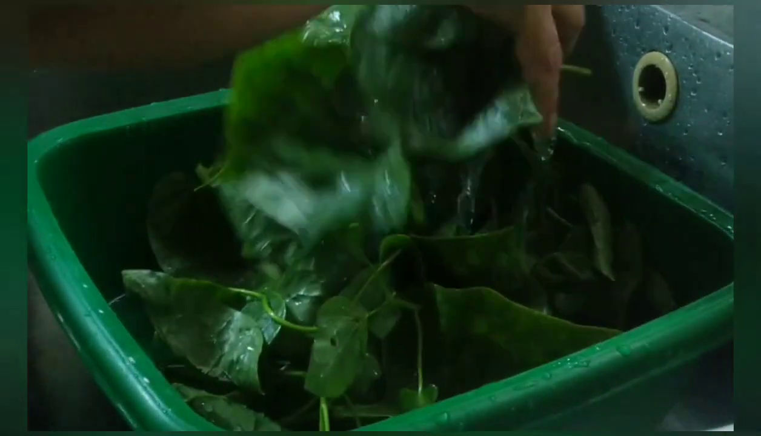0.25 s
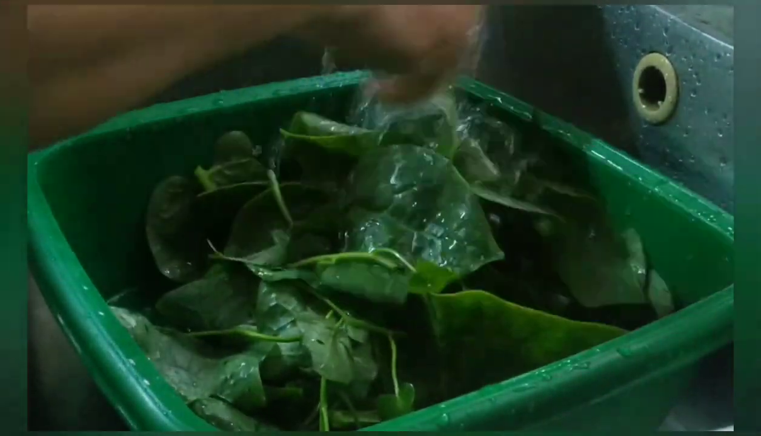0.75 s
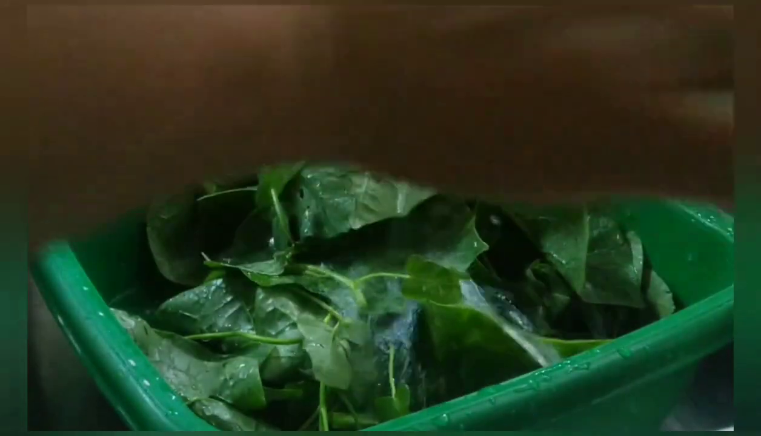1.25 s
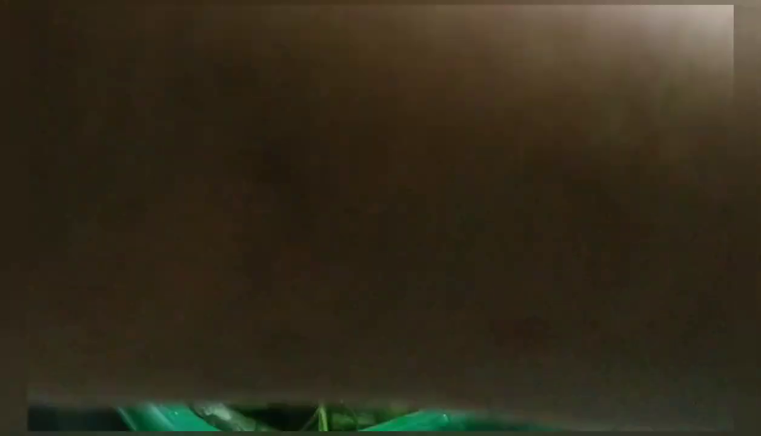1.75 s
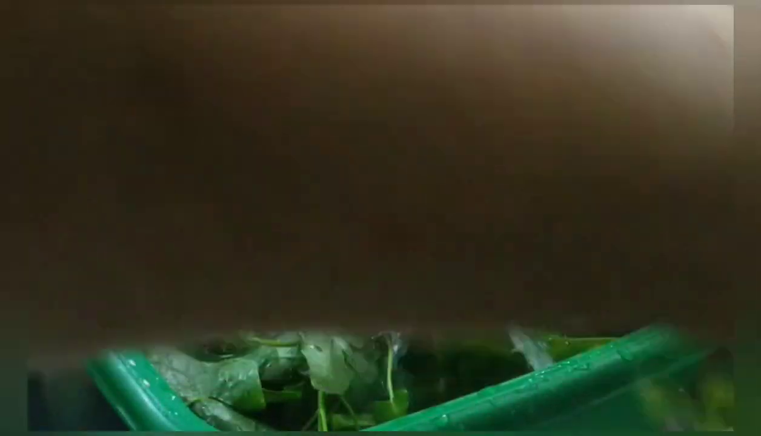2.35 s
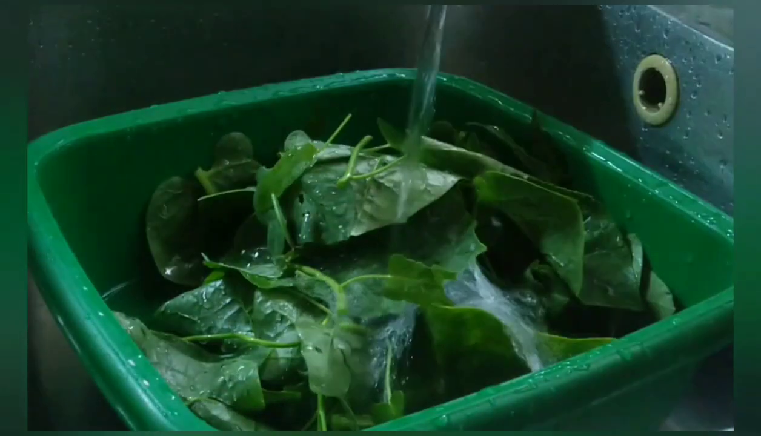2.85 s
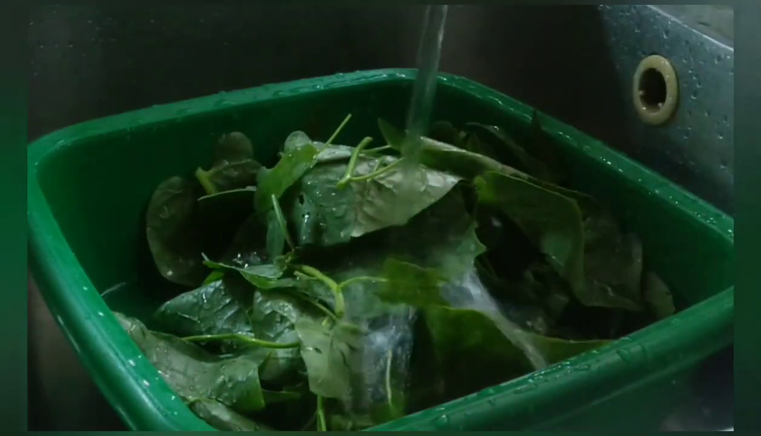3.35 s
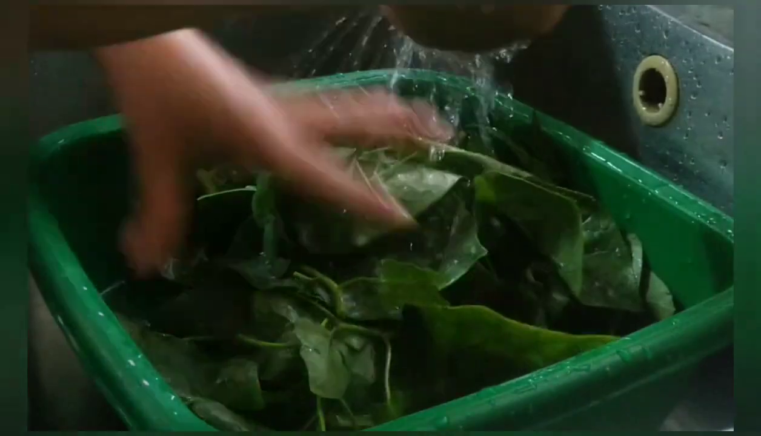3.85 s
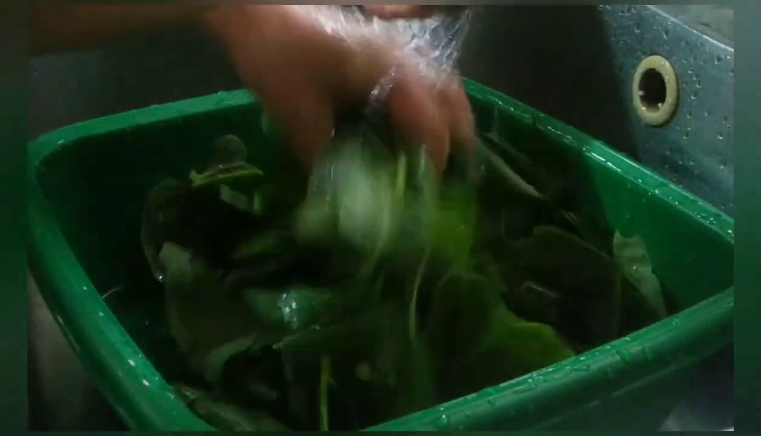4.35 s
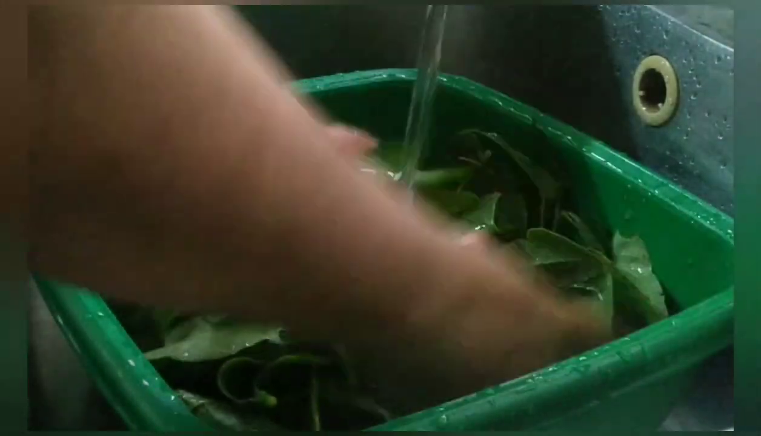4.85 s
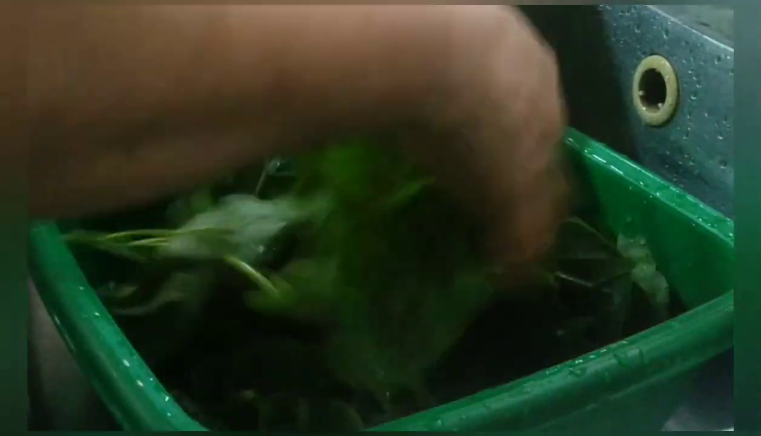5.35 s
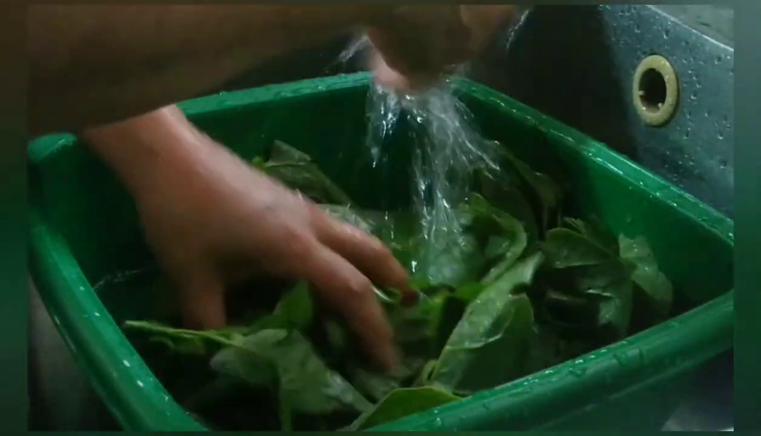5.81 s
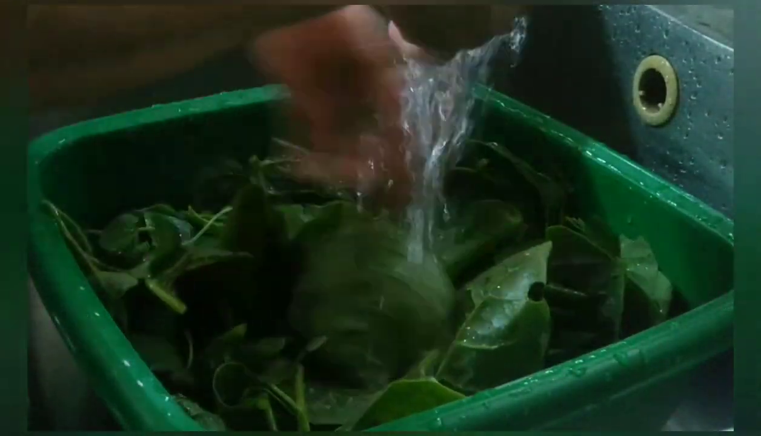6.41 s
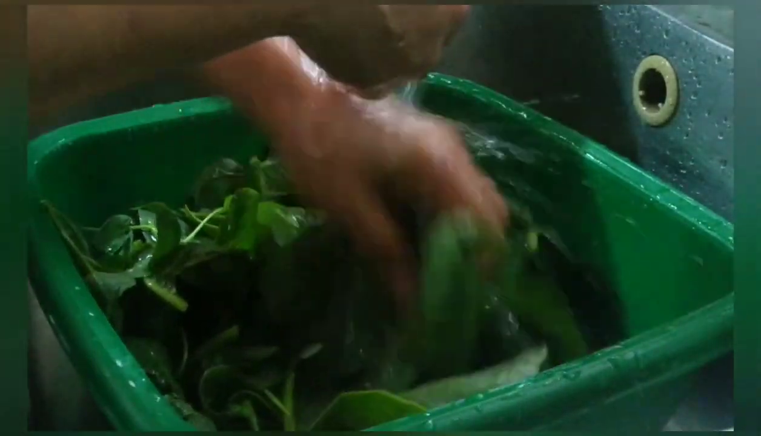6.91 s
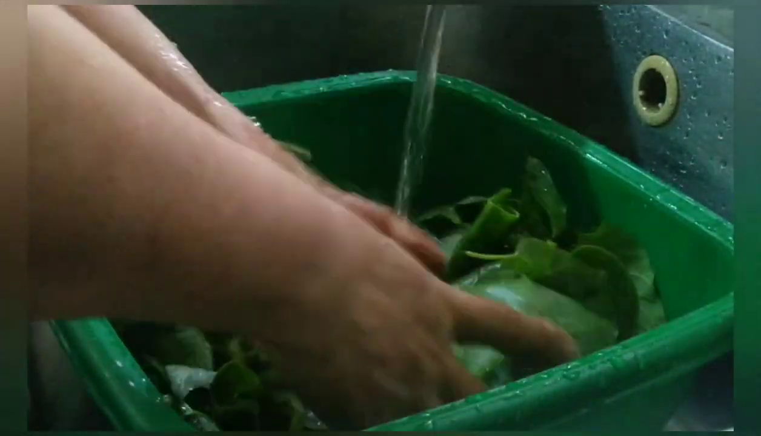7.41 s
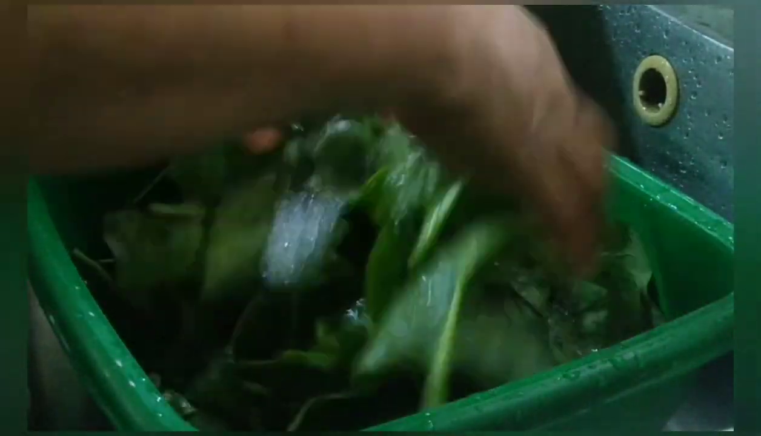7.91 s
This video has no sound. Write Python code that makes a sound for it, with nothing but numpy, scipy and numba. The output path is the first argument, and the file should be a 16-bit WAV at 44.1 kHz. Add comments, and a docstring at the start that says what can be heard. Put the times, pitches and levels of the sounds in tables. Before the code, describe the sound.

Tap water spatters onto leafy greens in a plastic basin as hands slosh them around, with knocks and one heavy clunk against the sink.

```python
"""A tap runs onto leafy greens in a plastic basin that stands in a steel kitchen sink, heard up close.
The water's sound comes from thousands of tiny bubbles, each ringing with a short, rising note.
Hands turn the leaves over: the stream spatters, wet leaves slosh and drip, air gulps in the pool below,
and the basin rocks and knocks. Once, something heavy clunks against the sink and sets the steel booming."""
import sys
import numpy as np
from scipy import signal
from scipy.fft import rfft, irfft, next_fast_len
from scipy.io import wavfile
from numba import njit

SR = 44100
rng = np.random.default_rng(int(sys.argv[2]) if len(sys.argv) > 2 else 0)


def wav_out(sig):
    """Save sig, one row per channel (or a flat mono array), as 16-bit PCM at SR to the path in sys.argv[1]."""
    wavfile.write(sys.argv[1], SR, np.round(np.clip(np.atleast_2d(sig).T, -1, 1) * 32767).astype(np.int16))


N = 360297
TIME = np.arange(N) / SR
TOP_HZ = 15900

# the stream landing on the leaves and running into the pool: (time [s], spatter [dB], gurgle [dB])
TAP_FLOW = [(0.0, -42, -53), (0.6, -47, -47), (1.15, -47, -49), (1.65, -47.5, -48), (2.3, -50.5, -48),
            (2.85, -43.5, -49.5), (3.6, -45, -44), (4.4, -42, -49.5), (5.2, -41.5, -47),
            (6.4, -41.5, -48.5), (8.17, -43.5, -46)]
def running_tap(slop):
    """The tap runs on while hands catch its stream, lift the leaves and press them under again."""
    landing, trickle = curves(TAP_FLOW)
    hush_db = catches()
    stream = landing * undb(hush_db)
    lift, runoff = lifts()
    plunge, air = plunges()
    spatter = together(stream, sprays())
    slosh = together(stream * undb(-7.5), lift, plunge)
    glug_db = 2 * flicker(count=160)  # the trickle reaches the pool in uneven gulps
    gurgle = together(trickle * undb(0.86 * hush_db + glug_db), slop)
    return water(spatter, slosh, gurgle) + burble() * air + drips() * runoff


# the tone of the spatter, the wet leaves and the pool: (frequency [Hz], boost [dB])
SPATTER_TONE = [(1500, 3), (3000, -11.5), (5000, -8), (6500, -6), (8500, -1), (10000, -1), (11200, -5.5),
                (12500, -2.5), (13300, 0), (14000, -5), (16000, 7.5)]
SLOSH_TONE = [(600, -63), (950, -6.5), (1250, -1.5), (1800, -2), (2600, 4.5), (3600, 6), (4800, 9),
              (6500, 8.5), (10000, -16)]
POOL_TONE = [(130, 20), (280, -9), (350, -6), (430, -0.5), (520, 1), (620, 1.5), (730, -10.5), (835, 6),
             (950, -4), (1250, 0.5), (1700, -17), (3000, -37)]
def water(spatter_gain, slosh_gain, pool_gain):
    """The stream breaks into fine spatter, wet leaves squeeze out larger bubbles, the pool gurgles."""
    surge = flicker(count=1100) + 1.35 * flicker(count=330)  # the stream arrives in uneven lumps
    spatter = colour(swarm(3222, 14580, cycles=30, spread_db=-2.5, glide=0.1, count=42000), SPATTER_TONE)
    slosh = colour(swarm(887, 7210, cycles=12.7, spread_db=-0.5, glide=0.29, count=22000), SLOSH_TONE)
    # bubbles in open water ring longer
    tinkle = colour(swarm(1518, 7400, cycles=50, spread_db=5, glide=0.22, count=2200), SLOSH_TONE)
    pool = colour(swarm(274, 1575, cycles=7.9, spread_db=-0.5, glide=0.21, count=6000), POOL_TONE)
    leaves = unit(slosh) * undb(-0.5) + unit(tinkle) * undb(-5)
    return (unit(spatter) * spatter_gain * undb(2 + 2 * surge)
            + leaves * slosh_gain * undb(1.46 * surge)
            + unit(pool) * pool_gain * undb(0.83 + 0.23 * surge))


# the tone of the jet on a leaf: (frequency [Hz], boost [dB])
JET_TONE = [(2900, -40), (3400, -0.5), (3700, -0.5), (4300, -4), (5500, 4), (11000, 6.5), (13300, 3),
            (16000, -1)]
# the jet falling freely onto that leaf: (time [s], level [dB])
JET_LEVELS = [(0.85, -50), (1.15, -47), (1.8, -48), (2.2, -46), (2.9, -56), (3.65, -45), (3.8, -65)]
def jet():
    """The unbroken jet patters on one leaf with a fluttering sizzle."""
    patter = colour(swarm(2430, TOP_HZ, cycles=6.5, spread_db=3, glide=0.05, count=24000), JET_TONE)
    flutter = undb(2.5 * flicker(count=400))
    return unit(patter) * curves(JET_LEVELS)[0] * flutter


# the stream is blocked: (time [s], hold [s], level change [dB])
STREAM_CATCHES = [(0.438, 0.11, -5), (0.73, 0.019, -3), (3.772, 0.034, -4), (3.848, 0.02, -4),
                  (4.41, 0.12, -12), (5.26, 0.1, -3.5), (5.843, 0.091, -3), (6.295, 0.2, -4.5),
                  (7.039, 0.1, -7), (7.806, 0.044, -5)]
def catches():
    """A hand or a bunch of leaves catches the stream and hushes it; gives the dip in dB."""
    return sum(db * gesture(s, hold, rise_s=0.014, fall_s=0.011) for s, hold, db in STREAM_CATCHES)


# bursts of spray: (time [s], hold [s], level [dB])
HAND_SPRAYS = [(0.32, 0.066, -41), (0.85, 0.019, -32.5), (0.965, 0.03, -36.5), (2.025, 0.0061, -36.5),
               (3.685, 0.025, -43), (3.96, 0.5, -42), (4.66, 0.094, -36), (4.98, 0.14, -36.5),
               (5.5, 0.32, -43), (6.04, 0.058, -35.5), (6.29, 0.17, -38), (6.6, 0.048, -34),
               (6.82, 0.21, -46), (7.172, 0.021, -37.5), (7.33, 0.29, -37.5), (7.67, 0.066, -32),
               (7.92, 0.33, -41.5)]
def sprays():
    """The stream sprays off a hand; gives the volume of the extra spatter."""
    return gestures(HAND_SPRAYS, rise_s=0.015, fall_s=0.024)[0]


# leaves coming up: (time [s], hold [s], slosh [dB], drips [dB])
LEAF_LIFTS = [(0.0, 0.01, -40, -36), (0.07, 0.19, -53, -39), (0.365, 0.02, -42, -57),
              (0.64, 0.04, -50, -44.5), (4.25, 0.11, -41, -49), (4.61, 0.14, -37.5, -52),
              (5.66, 0.25, -40.5, -46.5), (6.03, 0.41, -41.5, -43), (6.97, 0.04, -49, -40),
              (7.56, 0.2, -40.5, -41), (7.95, 0.28, -44.5, -57)]
def lifts():
    """Hands gather and lift wet leaves; gives the volumes of the slosh and the drips."""
    return gestures(LEAF_LIFTS, rise_s=0.005, fall_s=0.14)


def drips():
    """Small bright drips run off lifted leaves."""
    return swarm(4300, 7940, cycles=24, spread_db=4, glide=0.12, count=2600)


# leaves going under: (time [s], hold [s], slosh [dB], escaping air [dB])
LEAF_PLUNGES = [(0.89, 0.017, -40.5, -51), (1.92, 0.05, -49, -58), (3.96, 0.18, -36, -41),
                (4.82, 0.31, -35.5, -39), (5.4, 0.42, -46, -47.5), (6.7, 0.065, -40, -41),
                (7.23, 0.31, -36.5, -39.5), (7.93, 0.33, -46, -44.5)]
def plunges():
    """Hands press the leaves under water; gives the volumes of the slosh and the escaping air."""
    return gestures(LEAF_PLUNGES, rise_s=0.023, fall_s=0.19)


def burble():
    """Air escapes from sunken leaves in a rush of mid-sized bubbles."""
    return swarm(792, 1460, cycles=14.3, spread_db=2.5, glide=0.08, count=2200)


# pockets of air gulping: (time [s], level [dB], starting pitch [Hz], ring length [cycles])
AIR_POCKETS = [(0.660, -40, 895, 26), (0.745, -37.5, 516, 16), (0.813, -40.5, 804, 18),
               (1.218, -32.5, 517, 18), (4.568, -26.5, 810, 21), (4.569, -19, 520, 7.4),
               (4.593, -32, 448, 35), (4.625, -26, 623, 20), (5.457, -26, 530, 18), (5.478, -25, 527, 14),
               (6.195, -29, 780, 20), (6.198, -29, 600, 25), (6.228, -28.5, 794, 15), (7.314, -26, 570, 29),
               (7.337, -20.5, 543, 7.7), (7.858, -17, 480, 7.4), (7.954, -25.5, 470, 5.9),
               (7.981, -23.5, 583, 10.6), (7.989, -33, 580, 21), (7.99, -22, 1030, 5)]
def plops():
    """Large bubbles pinch off under the leaves; the water around them softens their start."""
    s, db, hz, cycles = np.transpose(AIR_POCKETS)
    rings = bubbles(s, hz, cycles, undb(db), lag=np.full(len(s), 2.5), glide=0.14)
    return colour(rings, [(100, 8), (350, 4.5), (1100, 9), (2000, 26), (5000, -25)])


# single drops and wet snaps of leaves: (time [s], level [dB], starting pitch [Hz], base length [cycles])
SINGLE_DROPS = [(0.079, -17, 7000, 22), (0.123, -30, 2410, 45), (0.183, -21, 5660, 41),
                (0.874, -17.5, 4470, 45), (1.096, -20, 6200, 23), (2.044, -19.5, 3240, 5),
                (2.747, -21, 6100, 6.4), (3.044, -17.5, 8500, 24), (3.723, -16, 6560, 11),
                (3.869, -25, 3720, 24), (4.024, -19, 4180, 41), (4.371, -22.5, 3460, 16),
                (4.447, -26, 1970, 39), (4.664, -16.5, 4450, 39), (5.665, -9.5, 7300, 2.1),
                (6.3, -19, 6980, 38), (6.522, -5.5, 6300, 3.3), (6.652, -15, 5570, 26),
                (6.662, -16.5, 2400, 16), (6.972, -30, 2470, 28), (7.115, -20, 3580, 36),
                (7.121, -16.5, 3960, 72), (7.676, -12, 7060, 16), (7.725, -14.5, 6200, 20),
                (7.921, -19.5, 4600, 4.3)]
def drops(scatter_s=0.011, count=12):
    """Each drop rings one bubble and throws quieter ones after it; the splash echoes in the basin."""
    s, db, hz, cycles = np.transpose(SINGLE_DROPS)
    main = bubbles(s, hz, 1.5 * cycles, undb(db - 1), lag=rng.normal(1.6, 0.7, len(s)), glide=0.09)
    delay, pitch, place = rng.random((len(s) * count, 3)).T
    s, db, hz = (np.repeat(column, count) for column in (s, db, hz))
    start = s + scatter_s * delay ** 1.5
    hz = np.minimum(hz * 2 ** (1.2 * pitch - 0.5), TOP_HZ)
    gain = undb(db - 3 - 7 * delay)  # later bubbles are quieter
    splash = bubbles(start, hz, np.full(len(s), 13.0), gain, lag=8 * place - 2, glide=0.25)
    return echoes(main + splash, near_db=0, near_s=0.035, room_db=-10, room_s=0.2)


# pushes on the basin: (time [s], hold [s], rocking [dB], gurgle [dB])
BASIN_SHOVES = [(0.935, 0.02, -33.5, -34.5), (1.46, 0.2, -44.5, -52), (1.78, 0.21, -38.5, -48.5),
                (1.95, 0.1, -36, -38), (4.08, 0.064, -45, -40.5), (4.19, 0.014, -37.5, -50),
                (4.86, 0.01, -43, -35.5), (4.92, 0.12, -32, -38), (6.62, 0.16, -60, -44),
                (7.29, 0.023, -34, -36), (7.5, 0.062, -43.5, -40.5)]
def shoves():
    """Shoves rock the basin and slop the pool; gives the volume of each."""
    return gestures(BASIN_SHOVES, rise_s=0.012, fall_s=0.062)


# knocks on the basin: (time [s], strength [dB], contact time [ms], boom of the sink [dB])
BASIN_KNOCKS = [(0.024, -17.5, 4.2, -30.5), (0.956, -27, 0.2, -47), (0.962, -18, 2.9, -45),
                (1.404, -41, 0.33, -54), (1.488, -27.5, 2.4, -24), (1.532, -34, 1.3, -32),
                (1.798, -26.5, 2.4, -30), (1.978, -29, 0.58, -38), (2.437, -32, 0.16, -38),
                (2.462, -20, 4.9, -36), (4.771, -16, 0.067, -17), (4.862, -29.5, 0.08, -45),
                (5.49, -22.5, 3.1, -41), (6.52, -19, 0.045, -19.5), (6.549, -28, 3.3, -29),
                (7.306, -28, 0.43, -36), (7.991, -27, 3.1, -50)]
# the water-filled plastic's short notes, single and in bands: (pitch [Hz], level [dB], base fade [s])
PLASTIC_NOTES = [(336.5, -11, 0.29), (396, -3.5, 0.074), (461.5, -3, 0.15), (598, 6.5, 0.02),
                 (750, -12.5, 0.12)]
PLASTIC_BANDS = [(155.6, -6, 0.22), (600, -7, 0.23), (980, -7, 0.13), (2320, -11, 0.17), (4430, -12, 0.08),
                 (8800, -14, .035)]
def basin(sink_ring, rocking_gain):
    """Knocks ring the plastic briefly; they and the rocking basin make the sink floor boom."""
    plastic = ringing(PLASTIC_NOTES) + crowded_ringing(PLASTIC_BANDS)
    knocks = convolve(blows([(s, db, ms) for s, db, ms, _ in BASIN_KNOCKS]), plastic)
    floor = colour(sink_ring, [(30, 4), (70, 5), (130, -3), (250, -5), (400, -2.5), (900, -47)])
    boom = convolve(blows([(s, db, 1.5) for s, _, _, db in BASIN_KNOCKS]), floor)
    damped = floor * fade(TIME[:SR], 0.087)  # the hands deaden the steel as they press
    rumble = convolve(rng.standard_normal(N), damped)
    rocking = colour(rumble, [(20, -11), (50, 11.5), (80, 3), (130, 4), (250, -5), (500, -5.5)])
    tremble = undb(-52.5)  # the stream keeps the basin shaking a little
    return knocks + boom + unit(rocking) * together(rocking_gain, tremble)


# the heavy clunk and its rattle: (time [s], strength [dB], contact time [ms])
CLUNK_HITS = [(3.278, -21, 0.57), (3.302, -9, 0.4), (3.307, -21, 1.1), (3.317, -10, 0.65),
              (3.338, -10, 0.86), (3.358, -33, 0.11), (3.371, -11, 1.3), (3.408, -20.5, 0.98),
              (3.436, -3.5, 8.6), (3.468, -15, 2.5), (3.490, -30, 0.57), (3.514, -27, 1.5)]
# bands of the sink's crowded higher notes: (pitch [Hz], level [dB], fade time [s])
SINK_NOTE_BANDS = [(286, -6.5, 0.16), (575, -6.5, 0.27), (1155, -3, 0.24), (2070, -7, 0.3),
                   (4530, -6, 0.41)]
def clunk(sink_ring):
    """Something heavy meets the sink, rattles and settles."""
    return convolve(blows(CLUNK_HITS), sink_ring + crowded_ringing(SINK_NOTE_BANDS))


# the sink's notes: (pitch [Hz], level [dB], base fade [s])
SINK_NOTES = [(49, -17, .5), (70.5, -9, .7), (92, -8, .55), (123, -10, .45), (134, -8, .48), (152, -7, .5),
              (172, -9, .45), (224, -10, .35), (254, -7, .35), (355, -11, .42), (423, -4, .4),
              (475, -5, .27), (510, 2, .42), (622, -2, .27), (832, 0, .25), (856, -3, .25), (899, -1, .36),
              (932, -2, .28), (1039, -3, .24), (1281, -9, .28), (1400, -6, .25), (1637, -8, .2)]
def sink():
    """A hit on the sink brings out low booms of its steel and the hollow ring of its bowl."""
    return ringing(SINK_NOTES) * undb(-6.5)


def echoes(x, near_db=-5, near_s=0.073, room_db=-12, room_s=0.42):
    """Sound bounces quickly off the nearby walls, then dies away in the kitchen."""
    t = TIME[:SR // 2]
    tails = rng.standard_normal((2, 2, len(t))) * (t > 0.001)
    near, room = tails[0] * fade(t, near_s), tails[1] * fade(t, room_s)
    response = (undb(near_db) * unit(near) + undb(room_db) * unit(room)) / np.sqrt(len(t))
    return (x + convolve(x, response)) / np.sqrt(1 + undb(near_db) ** 2 + undb(room_db) ** 2)


@njit
def bubbles(start, hz, cycles, gain, lag, glide):
    """Each bubble swells, then rises in pitch as it dies; the right side hears it lag samples later."""
    out = np.zeros((2, N))
    for k in range(len(start)):
        life = cycles[k] * SR / hz[k]
        for side in range(2):
            first = start[k] * SR + lag[k] * (side - 0.5)
            for i in range(max(int(first) + 1, 0), min(int(first + life), N)):
                age = (i - first) / life
                turns = cycles[k] * age * (1 + glide * age / 2)
                out[side, i] += gain[k] * min(turns, 1.) * np.exp(-5.5 * age) * np.sin(2 * np.pi * turns)
    return out


def swarm(low_hz, high_hz, cycles, spread_db, glide, count):
    """Bubbles ring at random times, pitches and places; spread_db makes their loudness uneven."""
    when, pitch, ring, size, place = rng.random((count, 5)).T
    hz = low_hz * (high_hz / low_hz) ** pitch
    lengths = cycles * 3 ** (2 * ring - 1)
    gain = undb(-spread_db * np.log(size + 0.035))
    lag = 3.3 + 1.7 * np.log((place + 0.013) / (1.02 - place)) / 2
    return unit(bubbles(when * TIME[-1], hz, lengths, gain, lag, glide))


def ringing(notes):
    """A struck object's separate notes, each dying away a little sooner than its base fade."""
    t = TIME[:SR]
    return sum(undb(db) * fade(t, 0.93 * fade_s) * np.sin(2 * np.pi * hz * t) * (-1) ** k
               for k, (hz, db, fade_s) in enumerate(notes))


def crowded_ringing(bands, width=0.74):
    """Notes too close to tell apart: octave bands of fading noise, partly different left and right."""
    t, out = TIME[:SR], 0
    for hz, db, fade_s in bands:
        band = signal.butter(3, [hz / np.sqrt(2), hz * np.sqrt(2)], "band", fs=SR, output="sos")
        mid, side = unit(signal.sosfilt(band, rng.standard_normal((2, len(t)))))
        out = out + undb(db) * fade(t, fade_s) * np.array([mid + width * side, mid - width * side])
    return out


def blows(rows):
    """The push of each hit: the longer the contact, the duller the sound."""
    out, ms = np.zeros(N), TIME[:2048] * 1000
    for s, db, contact_ms in rows:
        push = ms * np.exp(-4 * ms / max(contact_ms, 0.05))
        i = int(s * SR)
        out[i:i + len(push)] += undb(db) * push[:N - i] / push.sum()
    return out


def gesture(s, hold, rise_s, fall_s):
    """One movement of a hand: it builds up, holds and dies away."""
    age = TIME - s
    return np.clip(age / rise_s, 0, 1) * np.exp(-np.maximum(age - rise_s - hold, 0) / fall_s)


def gestures(table, rise_s, fall_s):
    """Many hand movements, as one volume curve for each dB column."""
    return together(*(np.outer(undb(dbs), gesture(s, hold, rise_s, fall_s)) for s, hold, *dbs in table))


def curves(table):
    """Join a table's points into one volume curve for each dB column."""
    s, *columns = np.transpose(table)
    return [undb(np.interp(TIME, s, db)) for db in columns]


def together(*gains):
    """The volume of unrelated sounds heard at once: their powers add."""
    return np.sqrt(sum(gain ** 2 for gain in gains))


def flicker(count):
    """A wander through count random values over the scene."""
    return np.interp(TIME, np.linspace(0, TIME[-1], count), rng.standard_normal(count))


def colour(x, points):
    """Shape a sound's tone with (frequency [Hz], boost [dB]) points."""
    hz, db = np.transpose(points)
    size = next_fast_len(x.shape[-1] + 4096)
    freqs = np.maximum(np.arange(size // 2 + 1) * SR / size, 1)
    gain = undb(np.interp(np.log(freqs), np.log(hz), db))
    return irfft(rfft(x, size) * gain, size)[..., :x.shape[-1]]


def convolve(x, response):
    """Give a sound the ring of an object or a room."""
    return signal.oaconvolve(np.atleast_2d(x), np.atleast_2d(response), axes=-1)[:, :N]


def fade(t, fade_s):
    """Die away, falling 60 dB in fade_s seconds."""
    return np.exp(-np.log(1000) * t / fade_s)


def undb(db):
    """Turn decibels into a volume multiplier."""
    return 10 ** (np.asarray(db) / 20)


def unit(x):
    """Scale a sound to an average power of 1."""
    return x / np.sqrt(np.mean(x ** 2))


def scene():
    """Water in the basin, and the sink that carries it."""
    rocking, slop = shoves()
    wet = echoes(running_tap(slop) + plops()) + drops() + jet()
    lean = undb([[0.36], [-0.36]])  # the water falls slightly to the left
    sink_ring = sink()
    return wet * lean + basin(sink_ring, rocking) + clunk(sink_ring)


# stereo width by frequency: (frequency [Hz], boost of left minus right [dB])
STEREO_WIDTH = [(60, -32), (125, -18), (250, -9), (500, -7), (1000, 1), (4500, -1.5), (6600, -4),
                (7300, -15), (16000, -7.5)]
def record(dry):
    """The sound is wide in the middle range, narrow in the bass and high treble; its top is cut."""
    mid = (dry[0] + dry[1]) / 2
    side = colour((dry[0] - dry[1]) / 2, STEREO_WIDTH)
    rounded = np.tanh(np.array([mid + side, mid - side]))  # softens the loudest peaks
    top_cut = signal.ellip(10, 0.2, 70, TOP_HZ, fs=SR, output="sos")
    return signal.sosfilt(top_cut, rounded)


dry = scene()
out = record(dry)
wav_out(out)
```